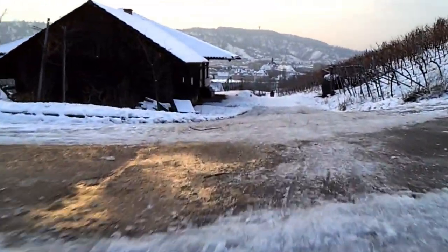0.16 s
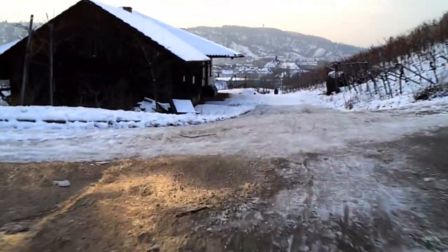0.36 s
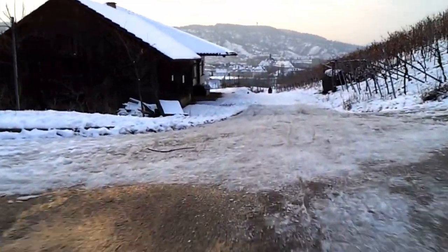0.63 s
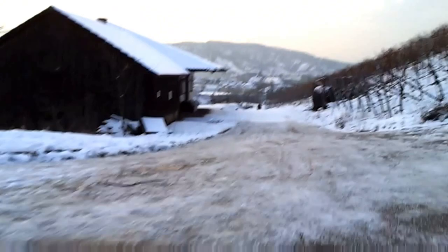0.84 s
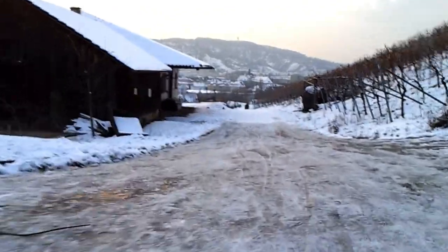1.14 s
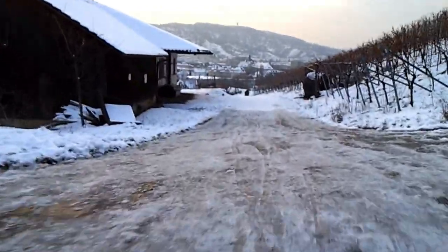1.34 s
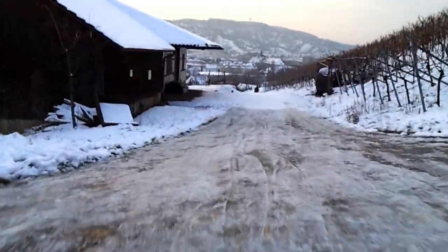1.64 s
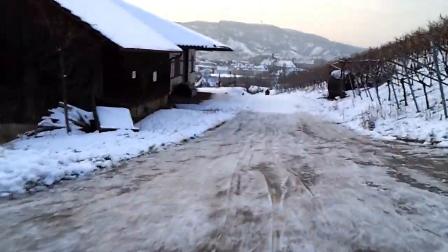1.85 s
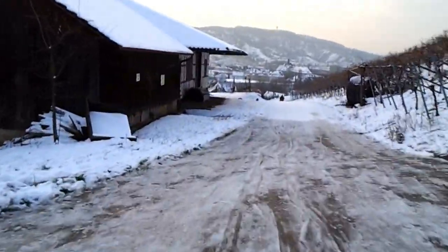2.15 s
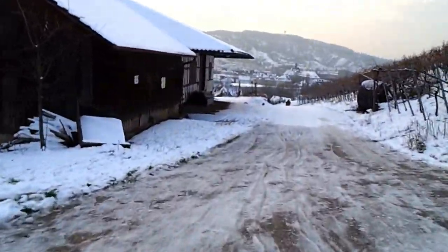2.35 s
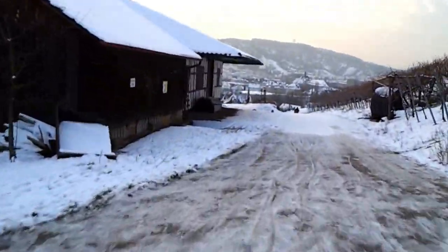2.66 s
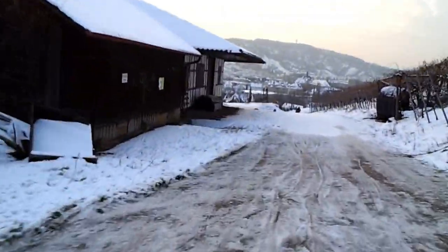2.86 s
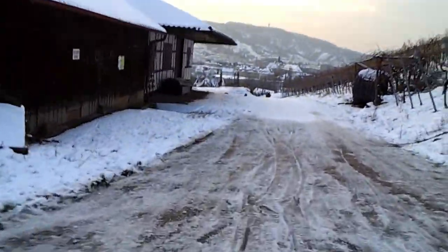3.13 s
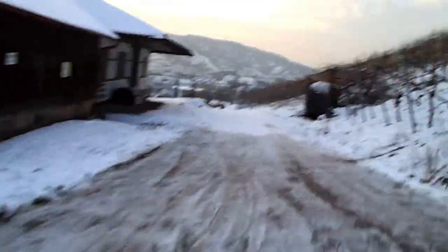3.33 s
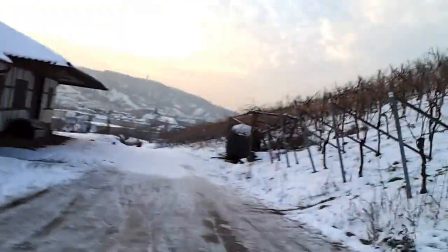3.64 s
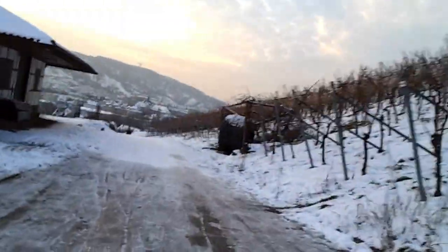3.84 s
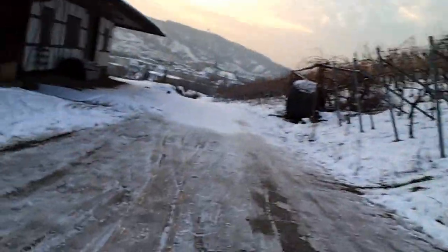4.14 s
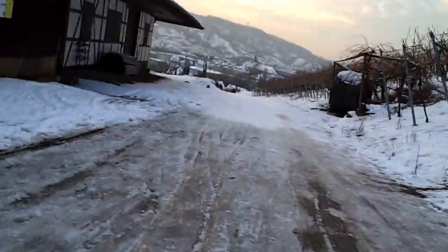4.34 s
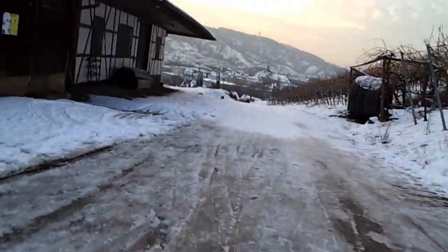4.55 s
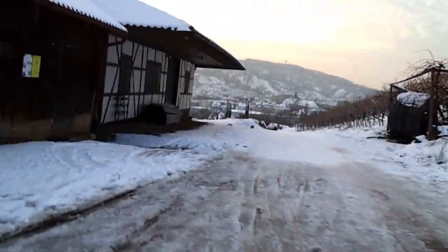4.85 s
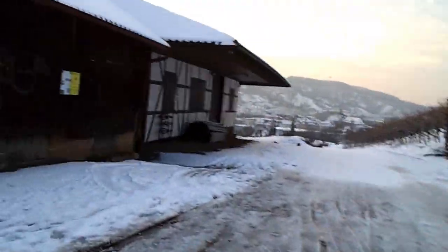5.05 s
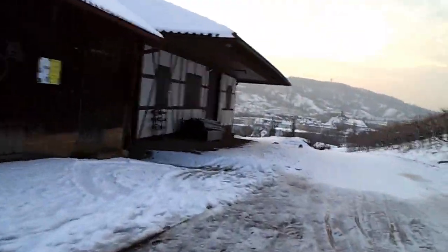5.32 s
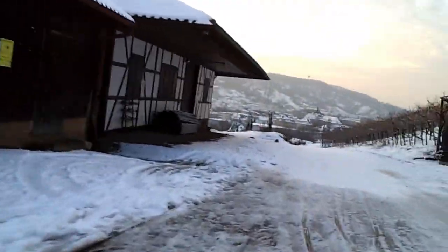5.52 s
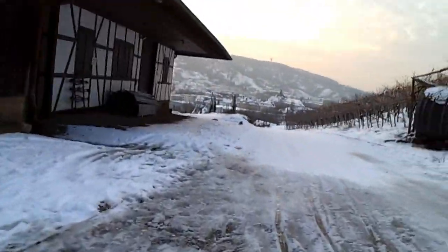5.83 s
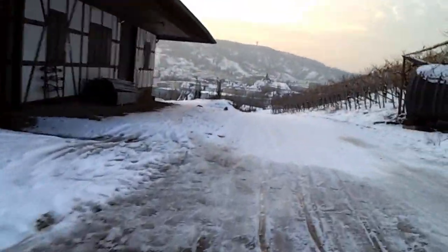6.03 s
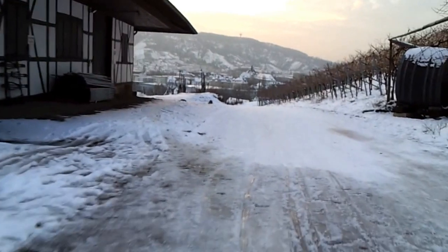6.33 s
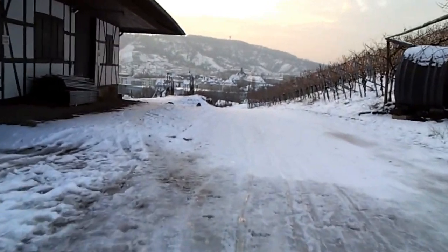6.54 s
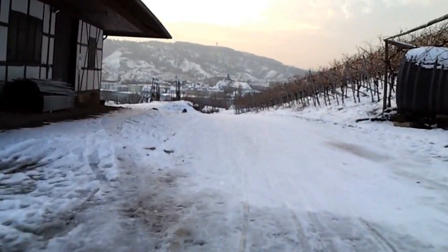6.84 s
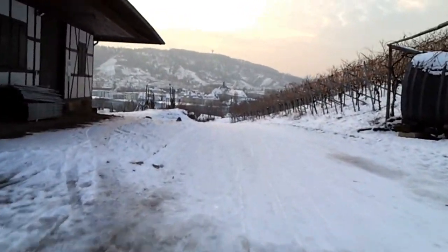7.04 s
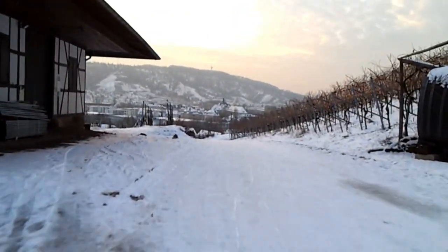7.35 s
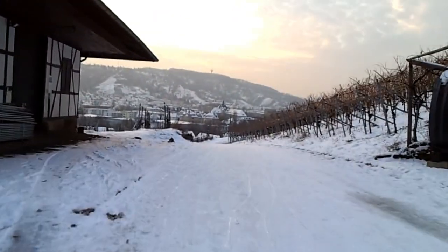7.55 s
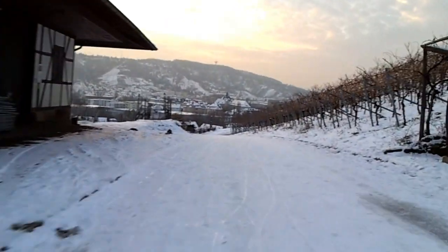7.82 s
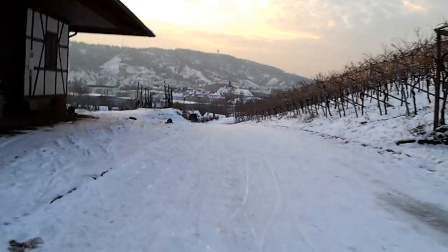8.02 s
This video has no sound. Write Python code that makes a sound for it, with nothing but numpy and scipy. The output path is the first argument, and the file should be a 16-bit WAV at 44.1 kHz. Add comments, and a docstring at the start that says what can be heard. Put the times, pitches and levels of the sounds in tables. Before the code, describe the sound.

A sled slides along an icy lane, its runners grinding, crunching and rasping under fluttering gusts of wind on the microphone.

```python
"""A sled carrying a camera runs down a lane. At first, on ice, friction makes its runners grind and hiss;
they click on lumps and crunch over grit while turbulent gusts tear at the exposed right microphone port.
The recorder turns itself down under each gust, so the hiss sinks and swells back. From 3.5 s the wind
drops and the edges rasp by stick and slip, with one long carve as packed snow begins at 4 s.
Near 5.8 s the gusts return, and the scrape fades over the last second."""
import sys
import numpy as np
from scipy import signal
from scipy.fft import rfft, irfft
from scipy.io import wavfile
from scipy.ndimage import uniform_filter1d, map_coordinates

SR = 44100
rng = np.random.default_rng(int(sys.argv[2]) if len(sys.argv) > 2 else 0)


def file_out(sig):
    """Save sig as 16-bit WAV at sys.argv[1]."""
    # one column per channel
    cols = np.atleast_2d(sig).T
    # limit, then scale
    lim = np.clip(cols, -1, 1)
    pcm = np.round(lim * 32767).astype(np.int16)
    wavfile.write(sys.argv[1], SR, pcm)


N = 360738
TIME, FREQS = np.arange(N) / SR, np.fft.rfftfreq(N, 1 / SR)

# impacts of a runner on lumps of ice: t/s, crack level/dB, ring level/dB
ICE_IMPACTS = [(0.104,-13,-8), (0.2331,-13,-5.5), (0.399,-14,-6), (0.8091,-5.5,-23), (0.892,-7,-8),
               (1.447,-16,-22), (1.517,-16,-14), (1.575,-10,-38), (1.596,-11,-17), (2.381,-10,-33),
               (2.522,-3.5,-20), (2.831,-21,-11.5), (6.572,-24,-12)]


def gain_of(db):
    return 10 ** (np.asarray(db) / 20)


def unit_rms(x):
    return x / np.sqrt(np.mean(x ** 2) + 1e-20)


def over_time(rows):
    """The columns of a time curve, interpolated at every sample."""
    times, *columns = np.transpose(rows)
    return [np.interp(TIME, times, c) for c in columns]


def over_frequency(rows, hz):
    """The columns of a spectrum, interpolated on a log-frequency axis."""
    f, *columns = np.transpose(rows)
    return [np.interp(np.log(hz + 1e-6), np.log(f), c) for c in columns]


def wander(rate_hz):
    """Low-pass noise of rms 1, with its corner at rate_hz."""
    return unit_rms(irfft(rfft(rng.standard_normal(N)) / np.sqrt(1 + (FREQS / rate_hz) ** 4), N))


def steadied(x, span_s):
    """Division by the running rms keeps only the fast swings of level."""
    size = max(int(span_s * SR), 8)
    return x / np.sqrt(abs(uniform_filter1d(uniform_filter1d(x ** 2, size), size)) + 1e-12)


def add(mix, start_s, sound):
    part = mix[max(round(start_s * SR), 0):][:len(sound)]
    part += sound[:len(part)]


def turbulence(eddy_hz, base_hz=400):
    """Frozen turbulence: a fixed eddy pattern is carried past the port, so frequency scales with speed."""
    # eddy spectrum: f/eddy rate, level/dB
    spectrum = [(.04, -44), (.12, -18), (.3, -2.5), (.55, 1), (.9, 1.5), (1.4, -1), (2.2, -6.5),
                (3.5, -16.5), (6, -31.5), (14, -57)]
    pattern = irfft(rfft(rng.standard_normal(N)) * gain_of(over_frequency(spectrum, FREQS / base_hz)[0]), N)
    position = np.cumsum(eddy_hz / base_hz) % (N - 1)
    return unit_rms(map_coordinates(pattern, [position], order=3, mode="wrap"))


def port_flow(level_db, eddy_hz, flutter_db, flutter_hz, span_s, weak_db=-21):
    """Flow separation: air clings to the port and tears off again, so the roar flutters."""
    puff = np.tanh(1.4 * wander(flutter_hz))
    air = turbulence(eddy_hz * np.exp(.1 * (puff - 1)))  # strong puffs are quicker
    depth_db = flutter_db + .3 * np.clip(weak_db - level_db, 0, 10)  # weak air grazes in separate taps
    return gain_of(level_db) * steadied(air * gain_of(depth_db * puff), span_s)


def gust_power(start_s, length_s, db, rise_s=.006, release_s=.008):
    """Power goes as pressure squared; the pressure ramps up, holds, and collapses as the flow lets go."""
    t = TIME - start_s
    release = np.exp(-np.clip(t - length_s, 0, .5) / release_s)
    return (gain_of(db) * np.clip(t / rise_s, 0, 1) * release) ** 2


def headwind(left_db=3.0, right_db=0.54, left_eddy_hz=430, right_eddy_hz=529.8):
    """Incoherent flows add in power: each port has its own breeze, and gusts join the right one."""
    # steady airflow over the sheltered left and the exposed right port: t/s, level/dB
    breeze_left = [(0.0,-17.5), (0.82,-17), (1.03,-28.5), (1.25,-33.5), (1.44,-18), (2.22,-21.5),
                   (2.56,-15.5), (2.66,-25.5), (3.0,-19.5), (3.45,-32), (3.7,-29), (4.7,-51), (5.15,-42),
                   (5.72,-25), (6.1,-30.5), (6.8,-30.5), (7.6,-37), (7.9,-28)]
    breeze_right = [(0.0,-13), (0.91,-17), (1.9,-14), (2.3,-21), (3.38,-14), (3.52,-25), (3.9,-36),
                    (4.3,-29), (4.8,-53), (5.6,-30.5), (5.83,-16.5), (6.41,-16.5), (6.48,-28), (6.7,-53),
                    (7.1,-30.5), (7.3,-15), (8.18,-24.5)]
    # gusts on the right port: t/s, duration/s, level/dB
    gust_events = [(0.474,0.07,-4.5), (0.592,0.1,-8), (1.063,0.091,-1), (1.163,0.14,-5), (1.48,0.05,-9),
                   (1.651,0.24,-10.5), (2.061,0.066,2), (2.135,0.061,-0.5), (2.446,0.048,-7.5),
                   (2.508,0.098,1), (2.606,0.17,-4), (2.848,0.042,-7), (2.948,0.13,-2), (3.113,0.35,-7.5),
                   (5.787,0.049,-6), (5.876,0.062,-6.5), (5.968,0.09,-4.5), (6.073,0.02,-6),
                   (6.112,0.13,-8), (6.265,0.046,-4), (6.328,0.032,0), (6.366,0.056,-6.5),
                   (7.278,0.098,-6.5), (7.387,0.081,-6.5), (7.502,0.028,-6), (7.558,0.078,-5.5),
                   (7.695,0.09,-12), (7.839,0.041,-13.5), (7.939,0.041,-6.5), (8.053,0.027,-4)]
    # eddy rate in the gusts, which follows the airspeed: t/s, f/Hz
    gust_eddies = [(0.5,759.8), (1.15,949.6), (1.7,681.3), (2.1,829.8), (3.3,921.5), (6.0,639.7), (7.4,519)]
    breeze = gain_of(over_time(breeze_right)[0]) ** 2
    gusts = sum(gust_power(*row) for row in gust_events)
    power = breeze + gusts
    eddy_hz = (breeze * right_eddy_hz + gusts * over_time(gust_eddies)[0]) / power
    left = port_flow(over_time(breeze_left)[0] + left_db, left_eddy_hz,
                     flutter_db=7, flutter_hz=38.3, span_s=.081)
    right = port_flow(10 * np.log10(power) + right_db, eddy_hz,
                      flutter_db=6, flutter_hz=79.94, span_s=.04)
    return np.array([left, right])


def thuds(left_hz=420, right_hz=480, quicken=.2, sharp_s=.0025):
    """Pressure pulses thud on the ports: blows of large eddies, and in the calm a few low thuds of the runners;
    the harder and shorter, the higher the sound."""
    # single blows of eddies, and a few low thuds of the runners: centre t/s, duration/s, level/dB, side (-1
    # left to 1 right)
    blows = [(0.752,0.013,-9.5,-1.2), (0.813,0.011,-3.5,-0.37), (0.875,0.016,-8.5,-1), (1.152,0.0027,7.5,1),
             (1.179,0.0044,-3,-1), (2.019,0.013,-6.5,-0.95), (2.071,0.004,6,0.99), (4.529,0.031,-17.5,0.93),
             (5.18,0.035,-20.5,-0.73), (5.383,0.01,-17,-0.74), (5.444,0.013,-18.5,-0.86),
             (5.494,0.014,-9.5,0.93), (5.52,0.0234,-12.5,0.59), (6.142,0.0088,6.5,1),
             (6.773,0.018,-16,-0.88), (7.652,0.0064,2,1), (7.902,0.006,-1.5,1)]
    force, pace = np.zeros((2, N)), np.ones(N)
    for centre, length, db, side in blows:
        start = centre - length / 2
        pulse = gain_of(db) * signal.windows.tukey(int(length * SR), .3)
        add(pace, start, np.full(len(pulse), sharp_s / length))
        for port, share in zip(force, np.clip([1 - side, 1 + side], 0, 2) / 2):
            add(port, start, np.sqrt(share) * pulse)
    eddy_hz = np.array([[left_hz], [right_hz]]) * pace * np.maximum(force, .1) ** quicken
    return force * np.array([steadied(turbulence(hz), span_s=.006) for hz in eddy_hz])


def port_cavity(air, low_hz=230, cavity_hz=540, width_hz=380, peak_db=3):
    """Cavity resonance behind the right port makes its puffs hollow; little deep rumble passes."""
    left, right = air
    resonance = gain_of(peak_db / (1 + ((FREQS - cavity_hz) / width_hz * 2) ** 2))
    high_pass = FREQS ** 2 / np.hypot(FREQS ** 2, low_hz ** 2)
    return np.array([left, irfft(rfft(right) * resonance * high_pass, N)])


def ringing(rise_s=.001, t60_s=0.02, detune=0.012):
    """Free vibration: each impact excites the damped modes of a runner, a little differently each time."""
    # runner modes: f/Hz, left level/dB, right level/dB
    modes = [(4590, -5, 3), (5320, -23, -8), (9500, -4, -22), (10500, -13, -22)]
    out, t = np.zeros((2, N)), np.arange(SR // 10) / SR
    envelope = (1 - np.exp(-t / rise_s)) ** 2 * gain_of(-60 * t / t60_s)
    envelope /= envelope.max()
    for start, _, ring_db in ICE_IMPACTS:
        for hz, *port_db in modes:
            cycles = hz * (1 + detune * rng.standard_normal()) * t
            for port, db in zip(out, port_db):
                tone = np.sin(2 * np.pi * (cycles + rng.random()))
                add(port, start, gain_of(ring_db + db) * envelope * tone)
    return out


def bites(left_db=-4, lead_rad=1.12, slip_db=5.0, slip_hz=45, one_slip_s=0.1):
    """Stick-slip friction feeds one runner resonance in uneven spurts; a short bite is a single slip."""
    # bites of an edge: t/s, duration/s, f/Hz, bandwidth/Hz, level/dB
    edge_bites = [(1.714, 0.018, 1530, 900, -23), (3.469, 0.014, 5120, 670, -7),
                  (3.44, 1.16, 980, 690, -23), (3.5, 0.9, 1740, 760, -25), (3.419, 0.449, 1410, 290, -20.5),
                  (4.995, 0.049, 1450, 1100, -14), (5.158, 0.035, 1430, 720, -11.5),
                  (5.569, 0.028, 1930, 2800, -12.5), (5.598, 0.12, 3070, 730, -19),
                  (5.683, 0.013, 2060, 3000, -8.5)]
    out, f = np.zeros((2, N)), np.fft.fftfreq(SR, 1 / SR)
    for start, length, hz, width, db in edge_bites:
        band = np.fft.ifft(np.fft.fft(rng.standard_normal(SR)) / (1 + ((f - hz) / width * 2) ** 4))
        spurts = gain_of(slip_db * min(length / one_slip_s, 1) * np.tanh(wander(slip_hz)[:SR]))
        rasp = (band * spurts)[:int(length * SR)]
        rasp *= signal.windows.tukey(len(rasp), .5)
        rasp *= gain_of(db) / rasp.real.std()
        add(out[0], start, gain_of(left_db) * (rasp * np.exp(1j * lead_rad)).real)
        add(out[1], start, rasp.real)
    return out


def carve(low_hz=1085, drift=0.0397, left_db=-4, lead_rad=0.97, slip_db=6.5):
    """Friction drives two resonances in surges: a hollow one wavers, a higher one slides with the load."""
    # one long carve of an edge: t/s, level/dB, upper resonance f/Hz
    surges = [(4.03,-45,2890), (4.19,-23,2770), (4.266,-12.5,2680), (4.31,-24,2745), (4.42,-17.5,2950),
              (4.48,-19.5,2788), (4.555,-18,2800), (4.65,-26,2700), (4.715,-13.5,2670), (4.755,-21,2900),
              (4.78,-11.5,3040), (4.86,-40,2910)]
    level_db, high_hz = over_time(surges)
    wavering_hz = low_hz * (1 + drift * wander(rate_hz=7.75))
    rasp = 0
    for hz, width_hz, db in [(wavering_hz, 220, -3), (high_hz, 680, 1)]:
        slips = (wander(width_hz / 2) + 1j * wander(width_hz / 2)) / np.sqrt(2)
        rasp = rasp + gain_of(db) * slips * np.exp(2j * np.pi * np.cumsum(hz) / SR)
    rasp *= gain_of(level_db + slip_db * np.tanh(wander(rate_hz=73)))
    rasp *= (TIME > surges[0][0]) & (TIME < surges[-1][0])
    return np.array([gain_of(left_db) * (rasp * np.exp(1j * lead_rad)).real, rasp.real])


def crystals(per_s=400, spread_db=4.0, snap_share=0.072):
    """Brittle fracture of snow crystals: the spectrum of separate snaps over countless tiny ones."""
    snaps = (rng.random(N) < per_s / SR) * rng.choice([-1, 1], N)
    snaps = snaps * gain_of(spread_db * np.minimum(rng.exponential(1, N), 4))
    return rfft(np.sqrt(snap_share) * unit_rms(snaps) + np.sqrt(1 - snap_share) * rng.standard_normal(N))


def grain_jolts(per_s, tick_db, tick_s, snow_share, ice_ends_s=4):
    """Random impacts of frozen grains lift the scrape, more on ice than on snow; gives the rise in dB."""
    hardness = np.where(TIME < ice_ends_s, 1, snow_share)
    jolts = (rng.random(N) < per_s / SR) * rng.random(N) * hardness
    return tick_db * np.minimum(signal.lfilter([1], [1, -np.exp(-1 / (tick_s * SR))], jolts), 1)


def crunch_envelopes(rise_share=0.024, decay_s=0.014, crack_s=0.0015, snap_db=2.0):
    """Transient excitation: a patch of grit gives a rise, hold and decay, a lump of ice one sharp crack."""
    # patches of grit or hard ice: t/s, duration/s, hiss level/dB, grind level/dB
    patches = [(0.08,0.012,-15,-25), (0.214,0.0081,-9.5,-15), (0.383,0.0074,-14,-13.5),
               (0.626,0.023,-5,-12), (0.681,0.029,-10,-15), (0.884,0.012,-6.5,-16), (0.909,0.16,-14,-23.5),
               (1.169,0.027,-15.5,-28), (1.372,0.042,-18.5,-16), (1.434,0.018,-18,-14),
               (1.669,0.011,-16,-25), (1.892,0.089,-14.5,-18), (2.343,0.013,-14,-21.5),
               (2.953,0.056,-11.5,-16), (3.469,0.0059,-5.5,-17), (3.869,0.08,-14.5,-24),
               (4.993,0.016,-10.5,-18), (5.517,0.012,-7,-12.5), (6.52,0.057,-12,-20),
               (6.681,0.0099,-10.5,-12), (6.735,0.03,-16,-25), (6.882,0.085,-15,-25.5),
               (7.099,0.028,-11.5,-18), (7.48,0.17,-19.5,-30)]
    hiss, grind, t = np.zeros(N), np.zeros(N), np.arange(SR // 4) / SR
    for start, length, hiss_db, grind_db in patches:
        envelope = (1 - np.exp(-t / (rise_share * length))) * np.exp(-np.maximum(t - length, 0) / decay_s)
        add(hiss, start, gain_of(hiss_db) * envelope)
        add(grind, start, gain_of(grind_db) * envelope)
    crack = t / crack_s * np.exp(1 - t / crack_s)
    for start, crack_db, ring_db in ICE_IMPACTS:
        add(hiss, start, gain_of(ring_db + snap_db) * crack)
        add(grind, start, gain_of(crack_db) * crack)
    return hiss, grind


def runners(split_hz=6000, bump_db=1.5, chatter_db=0.5):
    """Sliding friction makes broadband noise, a coarse grind and fine hiss shaken by bumps and chatter."""
    # strength of the scrape: t/s, hiss level/dB, grind level/dB
    glide = [(0.0, -25, -25), (0.29, -24, -24.5), (0.35, -31, -35), (0.41, -22, -22.5), (0.54, -24, -22),
             (0.84, -21, -25.5), (1.07, -17.5, -22), (1.15, -24, -22), (1.28, -21.5, -22.5),
             (1.51, -22.5, -23), (1.76, -20, -22.5), (2.24, -23, -24.5), (2.56, -15.5, -17.5),
             (2.64, -27.5, -28), (2.79, -33, -32), (2.83, -19, -21), (3.42, -13.5, -15.5),
             (3.55, -14, -17.5), (3.83, -15, -18.5), (4.3, -12.5, -16), (4.8, -16, -19.5),
             (5.22, -12.5, -17.5), (5.42, -17, -23), (5.62, -13.5, -16.5), (6.09, -19, -24.5),
             (6.45, -16.5, -20), (6.8, -13.5, -22), (7.02, -15.5, -24), (7.15, -13.5, -20.5),
             (7.73, -20, -27.5), (8.18, -23, -22)]
    # scrape spectrum at each port: f/Hz, level/dB
    left_spectrum = [(160, -10), (270, -1.5), (600, -2.5), (850, -3), (1100, 3.5), (1550, -1.5),
                     (2600, -1.5), (4600, -7), (6700, -20), (8300, -13), (10000, -6), (12000, -13),
                     (14600, -20)]
    right_spectrum = [(160, -8), (300, -8.5), (700, -1.5), (950, 1.5), (1300, 6.5), (1650, 1), (2400, 0.5),
                      (3700, 0), (4500, 0.5), (5300, -6), (6500, -21.5), (9000, -24.5), (14600, -36.5)]
    # likeness of the scrape at the two ports: f/Hz, coherence (0-1), phase lead of the left/rad
    port_coherence = [(100.54, 0.8, 6.2), (380, 0.78, 2.7), (1060, 0.65, 3.02), (1740, 0.82, 4.71),
                      (2500, 0, 5.9), (3530, 0.36, 5.6), (4190, 0, 11.46), (7700, 0, 17.6)]
    coherence, lead = over_frequency(port_coherence, FREQS)
    common, separate = crystals(), crystals()
    left = common * gain_of(over_frequency(left_spectrum, FREQS)[0])
    right = (coherence * common + np.sqrt(1 - coherence ** 2) * separate) * np.exp(-1j * lead)
    right *= gain_of(over_frequency(right_spectrum, FREQS)[0])
    ports = np.array([left, right])
    low_pass = 1 / (1 + (FREQS / split_hz) ** 8)
    grind, hiss = irfft(ports * low_pass, N), irfft(ports * (1 - low_pass), N)
    load_db = bump_db * np.tanh(wander(rate_hz=11.4)) + chatter_db * np.tanh(wander(rate_hz=96))
    hiss_glide, grind_glide = gain_of(over_time(glide))
    hiss_crunch, grind_crunch = crunch_envelopes()
    grind *= np.hypot(grind_glide, grind_crunch) / grind[0].std()
    hiss *= np.hypot(hiss_glide, hiss_crunch) / hiss[0].std()
    grind *= gain_of(load_db + grain_jolts(per_s=40, tick_db=10, tick_s=0.0028, snow_share=.55))
    hiss *= gain_of(load_db + grain_jolts(per_s=32, tick_db=8, tick_s=0.0074, snow_share=.4))
    return grind + hiss


def radiated(vibration, bass_hz=185):
    """Radiation efficiency falls at long wavelengths: narrow runners give almost no bass."""
    return irfft(rfft(vibration) * FREQS ** 4 / np.hypot(FREQS ** 4, bass_hz ** 4), N)


def scene():
    """Superposition of the sound of the runners and the wind pressure at the two ports."""
    sled = radiated(runners() + ringing() + bites() + carve())
    return sled + port_cavity(headwind() + thuds())


def louder_port_db(x, samples):
    """Running mean-square level of the louder port."""
    return 10 * np.log10(abs(uniform_filter1d(x ** 2, samples, axis=1)).max(0) + 1e-12)


def gain_control(x, threshold_db=-16.0, slope=0.53, lag_s=0.049, rumble_hz=900):
    """Automatic gain control: rumble in the louder port turns both ports down with a lag."""
    rumble = signal.sosfilt(signal.butter(4, rumble_hz, fs=SR, output="sos"), x)
    excess_db = np.maximum(louder_port_db(rumble, samples=880) - threshold_db, 0)
    pole = np.exp(-1 / (lag_s * SR))
    return x / gain_of(slope * signal.lfilter([1 - pole], [1, -pole], excess_db))


def record(dry, threshold_db=-9, slope=0.035, recover_db_per_s=120, edge_hz=14700):
    """Dynamic compression, first slow, then quick and slight; peaks clip, and the band is limited."""
    held = gain_control(dry)
    recovery_db = TIME * recover_db_per_s
    peak_db = np.maximum.accumulate(louder_port_db(held, samples=300) + recovery_db) - recovery_db
    excess_db = np.maximum(peak_db - threshold_db, 0)
    smoothing = np.hanning(400) / np.hanning(400).sum()
    ducked = held / gain_of(slope * signal.lfilter(smoothing, 1, excess_db))
    low_pass = signal.firwin(511, edge_hz, window=("kaiser", 8), fs=SR)
    return signal.oaconvolve(np.clip(ducked, -1, 1), low_pass[None], "same")


dry = scene()
out = record(dry)
file_out(out)
```